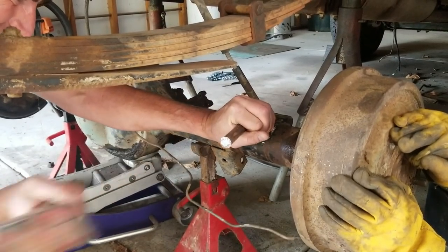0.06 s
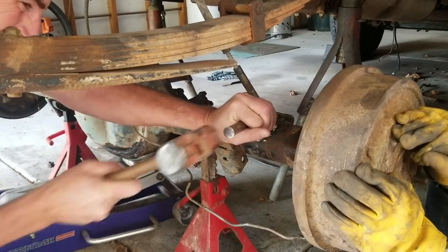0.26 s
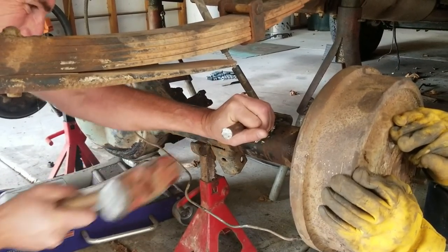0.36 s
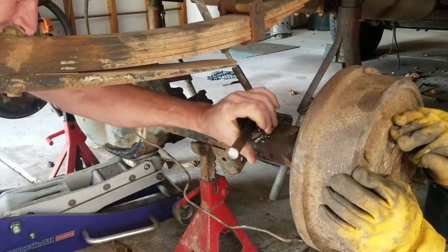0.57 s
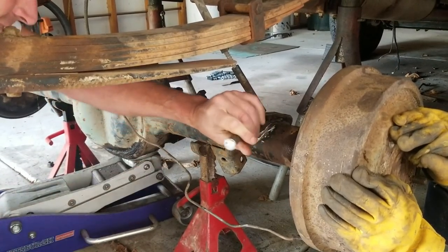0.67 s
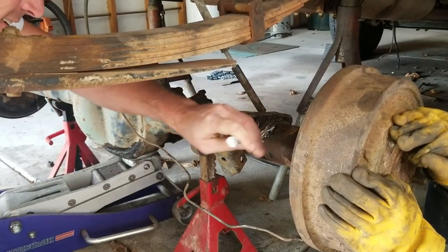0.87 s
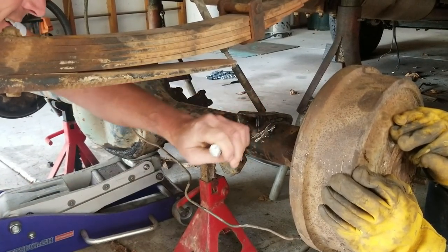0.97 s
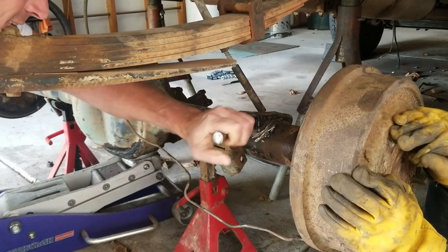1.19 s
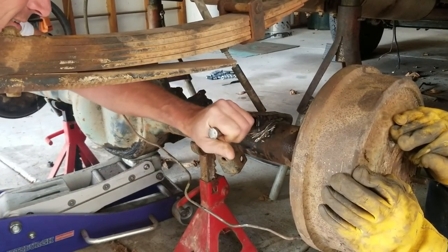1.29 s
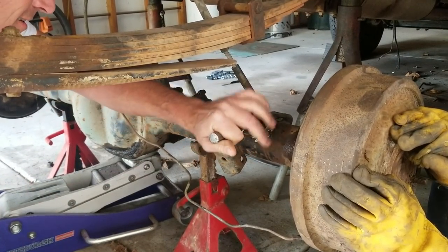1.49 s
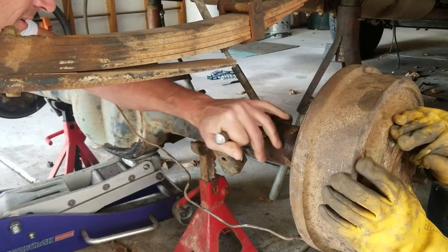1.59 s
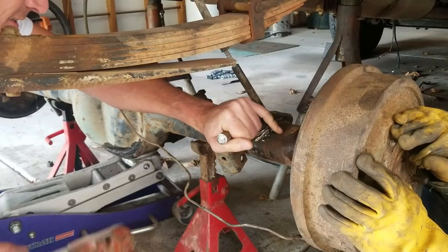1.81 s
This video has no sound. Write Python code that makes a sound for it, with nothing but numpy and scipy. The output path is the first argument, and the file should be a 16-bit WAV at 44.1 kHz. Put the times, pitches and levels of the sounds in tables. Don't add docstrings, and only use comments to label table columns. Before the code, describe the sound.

A hammer drives a chisel against a steel axle with one sharp, chattering clang and thin high ring; light metal knocks, a faint slide and firmer clinks follow, close-miked in stereo in a reverberant garage.

```python
import sys
import numpy as np
from scipy import signal
from scipy.io import wavfile
from scipy.ndimage import uniform_filter1d

SR = 44100
rng = np.random.default_rng(int(sys.argv[2]) if len(sys.argv) > 2 else 0)


def decibels_to_gain(level_db):
    exponent = np.asarray(level_db, float) / 20
    return 10 ** exponent


def master_out(mix):
    frames = np.transpose(np.atleast_2d(mix))
    ceiling = np.clip(frames, -1, 1)
    pcm = np.round(ceiling * 32767).astype(np.int16)
    wavfile.write(sys.argv[1], SR, pcm)


N = 81585

# (time [s], strength [dB], left-right [dB])
CONTACTS = [
    (0.2105, -4, 6),
    (0.218, 3, 0.5),
    (0.2218, -2, 1),
    (0.2275, -8.5, -5),
    (.236, -10, 0.5),
]
# (time [s], level [dB])
MOTION = [(0, -12.5), (.2, -10.5), (.45, -6.5), (.7, -24), (.95, -18), (1.2, -27.5), (1.35, -13),
          (1.5, -11), (1.62, -13), (1.74, -5.5), (1.79, -7.5), (1.85, -5)]
MIC_LAG_S = 0.00013


def evened(x):
    return x / np.sqrt(np.mean(x ** 2) + 1e-20)


def read(points, hz):
    f, value = np.transpose(points)
    return np.interp(np.log(hz + 1), np.log(f + 1), value)


def curve(points):
    return decibels_to_gain(np.interp(np.arange(N) / SR, *np.transpose(points)))


def add(mix, start_s, sound):
    part = mix[:, round(start_s * SR):][:, :sound.shape[1]]
    part += sound[:, :part.shape[1]]


def noise(colour, patchy_db):
    # (frequency [Hz], correlation [-1..1])
    likeness = [(60, 0.85), (240, 0.95), (950, -0.19), (3770, -0.076), (15000, 0.095)]
    frames, hz = N // 256 + 5, np.fft.rfftfreq(1024, 1 / SR)
    a, b, c, d, patches = rng.standard_normal((frames, 513, 5)).T
    patches = uniform_filter1d(patches, size=8, axis=0)
    patches = evened(uniform_filter1d(patches, size=10, axis=1))
    same = np.clip(read(likeness, hz), -1, 1)[:, None]
    left = a + 1j * b
    lag = np.exp(-2j * np.pi * hz * MIC_LAG_S)[:, None]
    right = same * left * lag + np.sqrt(1 - same ** 2) * (c + 1j * d)
    spectra = np.array([left, right]) * decibels_to_gain(read(colour, hz)[:, None] + patchy_db * patches)
    return evened(signal.istft(spectra, nperseg=1024, noverlap=768)[1][:, :N])


def rubbed(body, pressure):
    grit, out = rng.standard_normal((2, N)), 0
    grit = grit + 0.89 * grit[::-1]
    for hz, width_hz, db in body:
        turn = np.exp(2j * np.pi * hz * np.arange(N) / SR)
        r = np.exp(-np.pi * width_hz / SR)
        band = signal.lfilter([1 - r], [1, -r], grit / turn)
        band = signal.lfilter([1 - r], [1, -r], band)
        out = out + decibels_to_gain(db) * evened((turn * band).real)
    return evened(out) * curve(pressure)


def ring(modes, seconds, rise_s, tilt_db=0):
    apart_hz = 1450
    hz, db, t60, pan_db = np.transpose(modes)[:, :, None]
    t = np.arange(round(seconds * SR)) / SR
    fade = decibels_to_gain(db + tilt_db * np.log2(hz / 4000) - 60 * t / np.maximum(t60, 0.01))
    u = rng.random((2, len(modes), 1))
    left = 2 * np.pi * u[0]
    right = left - 2 * np.pi * (hz * MIC_LAG_S + (u[1] - 0.5) * np.minimum(hz / apart_hz, 1))
    sides = []
    for side, phase in ((0.94, left), (-0.75, right)):
        partials = fade * decibels_to_gain(side * pan_db / 2) * np.sin(2 * np.pi * hz * t + phase)
        sides.append(partials.sum(0))
    return np.array(sides) * (1 - np.exp(-t / rise_s))


def crowd(colour, t60, level_db, spread_db, count):
    u = rng.random((count, 3))
    hz = 150 + 15800 * ((np.arange(count) + u[:, 0]) / count) ** 1.5
    db = level_db + read(colour, hz) + 5 * np.log10(hz / 4000) + spread_db * (u[:, 2] - 0.5)
    return np.transpose([hz, db, read(t60, hz) * (0.55 + 0.49 * u[:, 1]), 0 * hz])


def gripped(sound, free_s, db_per_s, depth_db=200):
    held_s = np.arange(sound.shape[1]) / SR - free_s
    return sound * decibels_to_gain(-np.clip(db_per_s * held_s, 0, depth_db))


def wavering(count, depth_db):
    span = round(0.006 * SR)
    drift = uniform_filter1d(uniform_filter1d(rng.standard_normal(count), span), span)
    return decibels_to_gain(depth_db * evened(drift))


def room_hum():
    # (frequency [Hz], level [dB])
    hum_colour = [(15, -34), (25, -6), (291, -24.5), (499, -1.5), (1120, -11), (1250, -6), (1770, -14),
                  (4800, -33.5), (15700, -28.5)]
    return decibels_to_gain(-73.5) * noise(hum_colour, 0.5)


def rumble():
    # (frequency [Hz], level [dB])
    rumble_colour = [(15, -14.5), (30, -2), (60, -2), (100, -8), (200, -41.5), (400, -80.5)]
    return decibels_to_gain(-69.5) * curve(MOTION) ** 0.75 * noise(rumble_colour, 1.9)


def clothes():
    # (frequency [Hz], level [dB])
    rustle_colour = [(15, -52), (25, -23), (381, -1.5), (472, -8.5), (952, -9.5), (1090, -18), (1770, -13),
                     (5070, -12.5), (15700, -48.5)]
    return decibels_to_gain(-51.5) * curve(MOTION) * noise(rustle_colour, 3.1)


def scuff():
    # (frequency [Hz], level [dB])
    grit_colour = [(2000, -28), (5000, -2), (8000, -9), (11000, 1.5), (14000, -2), (16000, -7.5)]
    # (time [s], level [dB])
    scuff_level = [(1.35, -110), (1.5, -84), (1.56, -85), (1.7, -79), (1.74, -70), (1.78, -72.5),
                   (1.85, -69.5)]
    return curve(scuff_level) * noise(grit_colour, 2.1)


def tool_drag():
    # (frequency [Hz], width [Hz], level [dB])
    tool_body = [(415, 18, 3), (600, 40, -7), (1370, 30, -6), (1560, 50, -6), (2550, 200, -16)]
    # (time [s], level [dB])
    drag_pressure = [(1.48, -80), (1.6, -65), (1.7, -63), (1.79, -65), (1.85, -62)]
    return rubbed(tool_body, drag_pressure)


def hammer_slide():
    # (frequency [Hz], width [Hz], level [dB])
    head_body = [(636, 170, 0), (870, 100, -4), (1495, 250, -1.5), (1640, 210, -0.5), (3400, 130, -11.5)]
    # (time [s], level [dB])
    slide_pressure = [(.8, -87.5), (.86, -68), (.96, -63), (1.03, -64.5), (1.13, -77), (1.22, -94)]
    return rubbed(head_body, slide_pressure)


def stand_lines():
    POST, COLLAR, FOOT, LEG, RIB = 4378, 3968, 986, 1978, 2191
    # (time [s], frequency [Hz], level [dB], t60 [s], free ring [s])
    woken = [(0.68, POST, -61, 0.53, 0.098), (.678, FOOT, -59.5, .4, .032), (.678, LEG, -72, 0.37, 0.045),
             (0.73, FOOT, -49.5, 0.43, 0.0047), (.757, FOOT, -47, 0.21, 0.041),
             (.746, LEG, -51.5, 0.33, 0.048), (0.82, COLLAR, -53, 0.16, 0.056),
             (.748, POST, -70, 0.35, .02), (0.75, POST, -56, 0.45, .045), (0.89, POST, -54.5, 0.18, .05),
             (.808, FOOT, -63, .2, .02), (.808, LEG, -62, 0.35, .04), (0.72, COLLAR, -63, 0.25, 0.047),
             (.92, POST, -59.5, 0.37, 0.087), (.92, LEG, -56.5, 0.37, 0.034),
             (.935, FOOT, -58.5, 0.37, 0.023), (1.265, COLLAR, -37, 0.13, .012),
             (1.258, POST, -33.5, .3, 0.01), (1.2715, POST, -34.5, 0.11, 0.018),
             (1.269, FOOT, -42.5, 0.12, 0.019), (1.274, RIB, -47.5, 0.18, 0.027),
             (1.312, POST, -50, 0.26, 0.016), (1.334, POST, -40.5, 0.19, 0.0066),
             (1.318, LEG, -46, 0.15, .05), (1.316, COLLAR, -50, .12, 0.036), (1.4, LEG, -58.5, 0.62, 0.06),
             (1.42, POST, -61, 0.54, 0.039), (1.54, POST, -68, 0.55, 0.037), (1.3, LEG, -67, .6, .06)]
    out, t = np.zeros((2, N)), np.arange(round(0.3 * SR)) / SR
    side_lag_s = np.array([[0], [0.00003]])
    for start_s, hz, db, t60, free_s in woken:
        turn = hz * (t - side_lag_s) + rng.random()
        sound = np.sin(2 * np.pi * turn) * decibels_to_gain(db - 60 * t / t60) * (1 - np.exp(-t / 0.0015))
        add(out, start_s, gripped(sound * wavering(len(t), 1.2), free_s, 1600, 18))
    return out


def knocks():
    # (time [s], thud level [dB], bar level [dB], plate level [dB], brightness [dB per octave])
    hits = [
        (0.677, -59, -67, -73.5, -6.5),
        (.746, -46, -62, -55, -3.5),
        (.808, -50, -59.5, -66.5, -5),
        (.92, -56.5, -58, -63, -3),
        (1.2585, -37.5, -33, -46.5, -2),
        (1.269, -31.5, -28, -44.5, -1),
        (1.3156, -34.5, -43, -46.5, 2),
        (1.334, -49, -54.5, -44.5, 1.5),
        (1.709, -64, -85, -86, -8),
    ]
    # (frequency [Hz], level [dB])
    thud_colour = [(150, -38.5), (500, -21), (1000, -6), (3000, -1), (4200, -4), (6000, -16), (9000, -39.5),
                   (11500, -32), (14000, -66)]
    # (frequency [Hz], t60 [s])
    thud_t60 = [(150, 0.27), (1000, 0.093), (4000, 0.054), (14000, 0.12)]
    # (frequency [Hz], level [dB], t60 [s], left-right [dB])
    bar_modes = [(4300, -10, .1, 0), (4440, -7, .15, 0), (4505, -10, .12, 0)]
    # (frequency [Hz], level [dB], t60 [s], left-right [dB])
    plate_modes = [(630, -11, .35, 0), (1303, -7, .25, 0), (1637, -8, .12, 0), (1900, -8, .5, 0),
                   (2191, -5, .12, 0), (2600, -8, .45, 0), (3390, -6, .2, 0), (3494, -8, .6, 0),
                   (3150, -10, .5, 0), (3590, -8, .2, 0)]
    out = stand_lines()
    for start_s, thud_db, bar_db, plate_db, tilt_db in hits:
        thud_modes = crowd(thud_colour, thud_t60, -7, 7.8, count=120)
        add(out, start_s, decibels_to_gain(thud_db) * ring(thud_modes, 0.14, 0.0018, tilt_db))
        for modes, db, slope_db in ((bar_modes, bar_db, 0), (plate_modes, plate_db, tilt_db)):
            sound = ring(modes, 0.36, 0.0016, slope_db)
            sound = sound * decibels_to_gain(db) * wavering(sound.shape[1], 3)
            add(out, start_s, gripped(sound, free_s=0.028, db_per_s=902, depth_db=8))
    return out


def chisel():
    # (frequency [Hz], level [dB], t60 [s], left-right [dB])
    rod_modes = [(7570, -62, .5, 3), (11470, -47, .8, 4), (11488, -60, .8, 4)]
    # (frequency [Hz], level [dB], t60 [s], left-right [dB])
    overtone = [(15371, -75, .4, 1)]
    # (time [s], level [dB])
    rocks = [(.375, -4), (.43, -13), (.493, -8), (.57, -9), (.665, -9)]
    rock_s = 0.011
    out, t = np.zeros((2, N)), np.arange(N) / SR
    add(out, 0, decibels_to_gain(-38) * ring(rod_modes, 0.2, 0.001))
    add(out, 0.275, decibels_to_gain(5) * gripped(ring(rod_modes, 0.5, 0.035), 0.26, 300, 9))
    add(out, 0.385, ring(overtone, 0.2, 0.01))
    dips_db = sum(db * np.exp(-((t - s) / rock_s) ** 2) for s, db in rocks)
    return out[:1] * decibels_to_gain(np.array([[0], [-3]])) * decibels_to_gain(dips_db)


def face_and_axle():
    # (frequency [Hz], level [dB], t60 [s], left-right [dB])
    face_modes = [(3952, -7.5, .12, -12.5), (10120, -23, 0.15, 3.5)]
    axle_hz = [238, 635, 990, 2210, 2243, 105, 2686, 2979, 3085, 3390, 3693, 3764, 3901, 3965, 4025, 4409,
               4533, 5206]
    # (level [dB], t60 [s], left-right [dB])
    axle_decay = [(-35, 0.34, 4.5), (-27.5, .3, 1.5), (-19.5, 0.16, 0.5), (-22, .15, 3), (-22.5, 0.44, 1.5),
                  (-42.5, 0.07, 2.5), (-14.5, .2, 0.5), (-25, .45, 1.5), (-31, .6, -0.5),
                  (-13.5, 0.054, -0.5), (-29.5, 0.3, 0.5), (-21, 0.14, -2.5), (-11, 0.082, -4),
                  (-15, 0.13, -4.5), (-14.5, 0.22, -4), (-18, .3, -4), (-18.5, .2, -3.5), (-19.5, 0.071, 0)]
    out = np.zeros((2, N))
    add(out, CONTACTS[0][0], gripped(ring(face_modes, 0.03, 0.00047), free_s=0.0055, db_per_s=4500))
    add(out, CONTACTS[1][0], decibels_to_gain(-7) * ring(np.column_stack([axle_hz, axle_decay]), 0.5, 0.0012))
    return out


def frame_clang():
    # (frequency [Hz], level [dB])
    frame_colour = [(100, -44.5), (480, -27.5), (700, -19.5), (1100, -13), (2200, -12.5), (3500, -5.5),
                    (6000, -9.5), (8300, -22), (10800, -13), (16000, -25)]
    # (frequency [Hz], t60 [s])
    frame_t60 = [(150, 0.057), (700, .12), (2000, 0.1), (4000, 0.089), (8000, 0.045), (16000, .07)]
    out = np.zeros((2, N))
    frame_modes = crowd(frame_colour, frame_t60, -18.5, 4.3, count=330)
    for start_s, db, pan_db in CONTACTS:
        sides = decibels_to_gain([[db + pan_db / 2], [db - pan_db / 2]])
        add(out, start_s, ring(frame_modes, 0.11, rise_s=0.0017) * sides)
    return out


def garage(x):
    # (frequency [Hz], t60 [s])
    room_t60 = [(150, 1), (600, 0.99), (1500, 0.45), (3000, 0.64), (6000, 0.43), (9000, 0.31),
                (16000, 0.16)]
    taps = np.zeros((2, SR))
    at = np.arange(300, SR - 20, 20) + rng.integers(0, 20, (2, (SR - 301) // 20))
    np.put_along_axis(taps, at, rng.choice([-1., 1.], at.shape), 1)
    hz, t, z = signal.stft(taps, SR, nperseg=256)
    decay = decibels_to_gain(-60 * t / read(room_t60, hz)[:, None])
    tail = signal.istft(z * decay, SR, nperseg=256)[1]
    return signal.fftconvolve(x, tail / np.linalg.norm(tail[0]), axes=1)[:, :N]


def scene():
    floor = room_hum() + rumble() + clothes() + scuff()
    rubbing = tool_drag() + hammer_slide()
    light, clang, tones = knocks(), frame_clang(), face_and_axle()
    wet = garage(decibels_to_gain(-14.5) * clang + decibels_to_gain(-22) * tones + decibels_to_gain(-10.5) * light)
    return floor + rubbing + light + chisel() + clang + tones + wet


def roll_off(x):
    return signal.sosfilt(signal.butter(12, 15880, fs=SR, output="sos"), x)


def record(dry):
    t = np.arange(N) / SR - CONTACTS[0][0]
    duck_db = uniform_filter1d(-20 * ((t > -0.010) & (t < -0.002)), size=100)
    x = np.clip(dry * decibels_to_gain(duck_db), -1, 1)
    lowpass = signal.firwin(511, 16000, window=("kaiser", 9), fs=SR)
    return roll_off(signal.oaconvolve(x, lowpass[None], "same"))


dry = scene()
out = record(dry)
master_out(out)
```